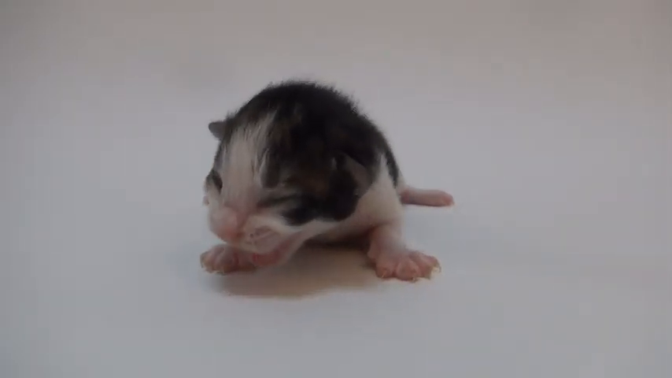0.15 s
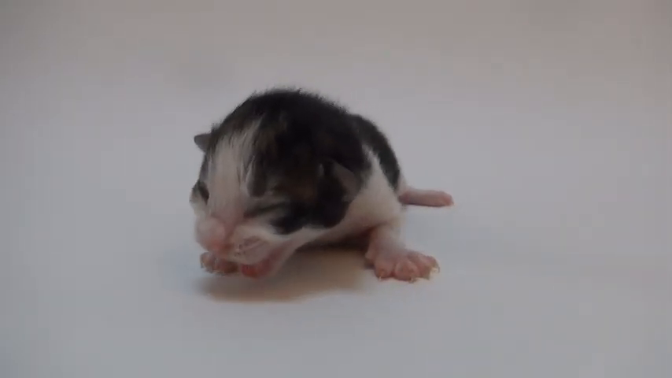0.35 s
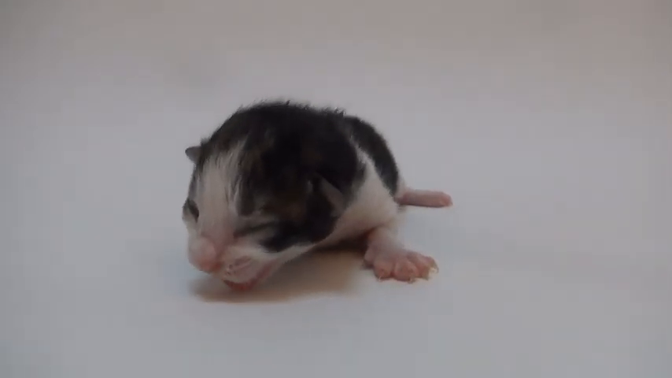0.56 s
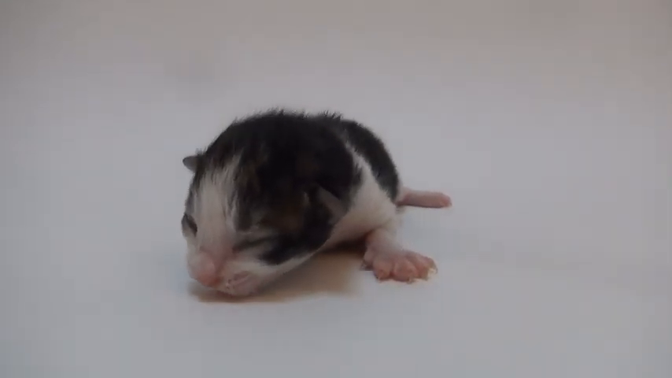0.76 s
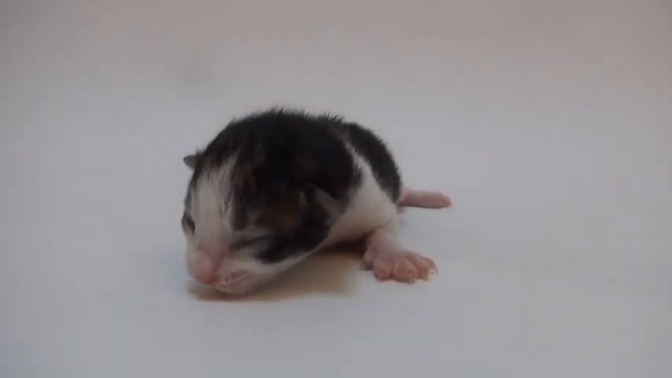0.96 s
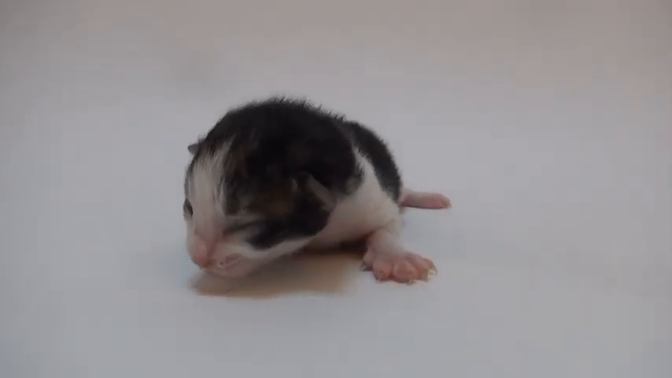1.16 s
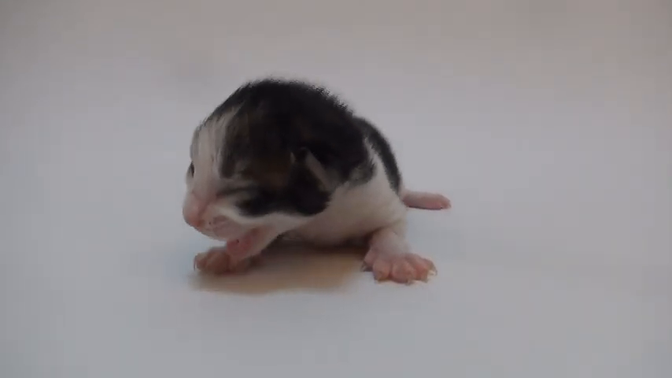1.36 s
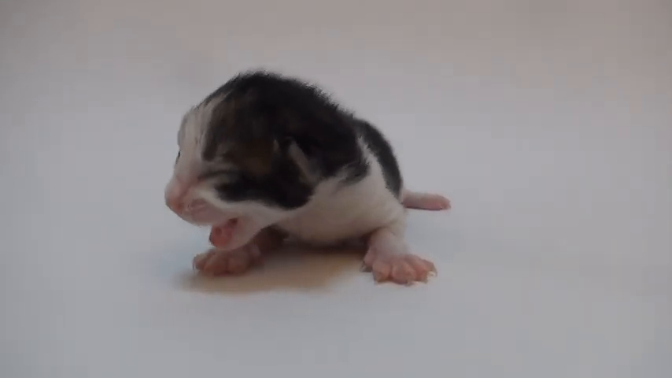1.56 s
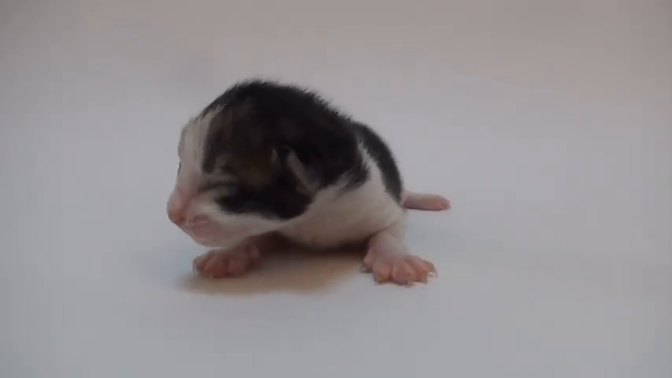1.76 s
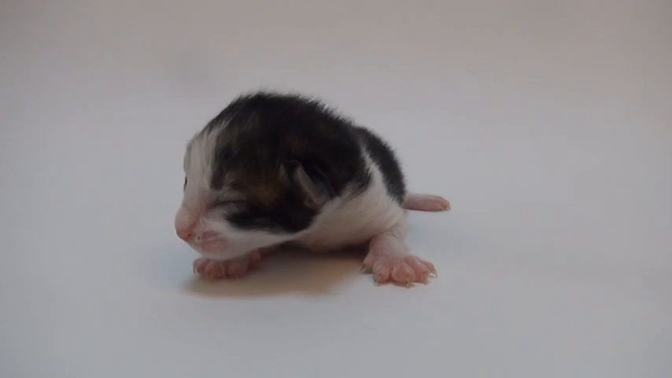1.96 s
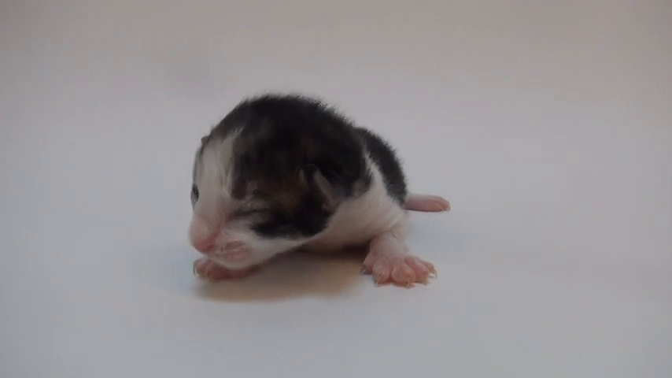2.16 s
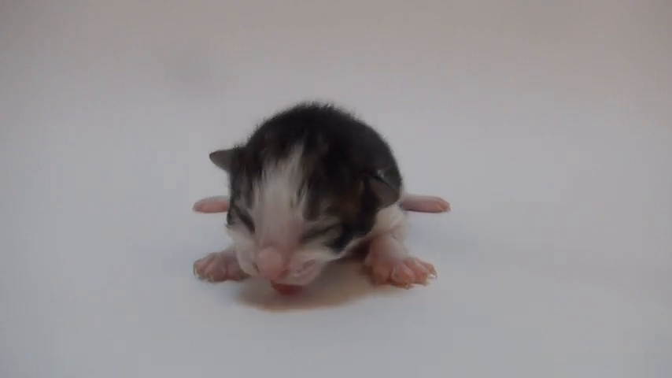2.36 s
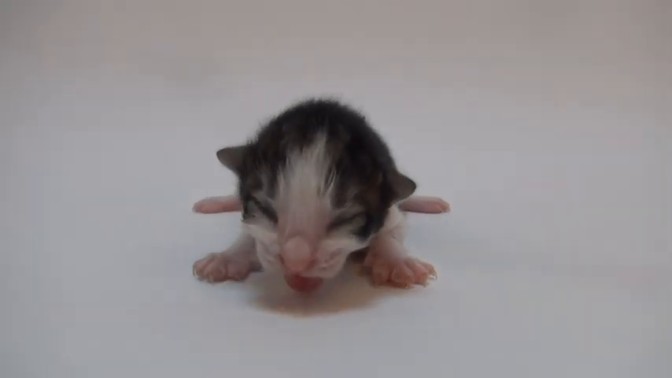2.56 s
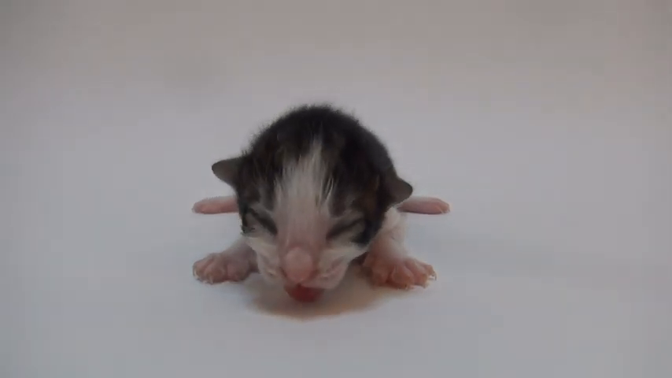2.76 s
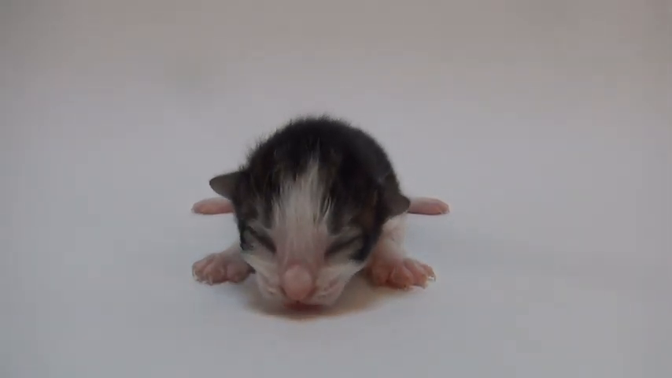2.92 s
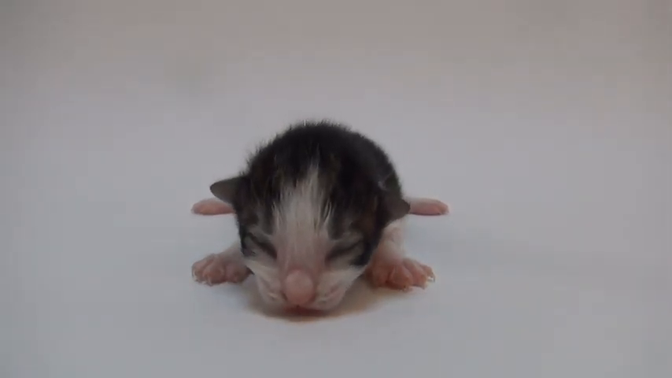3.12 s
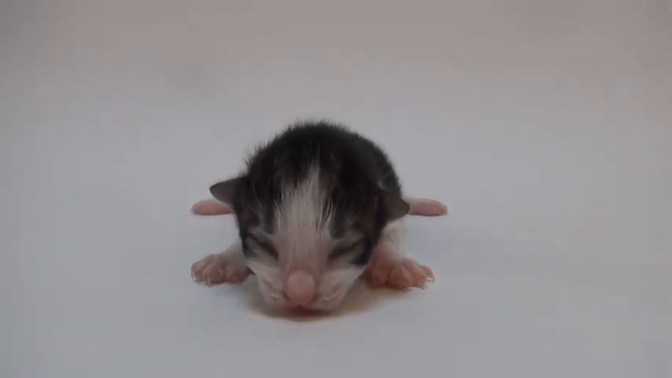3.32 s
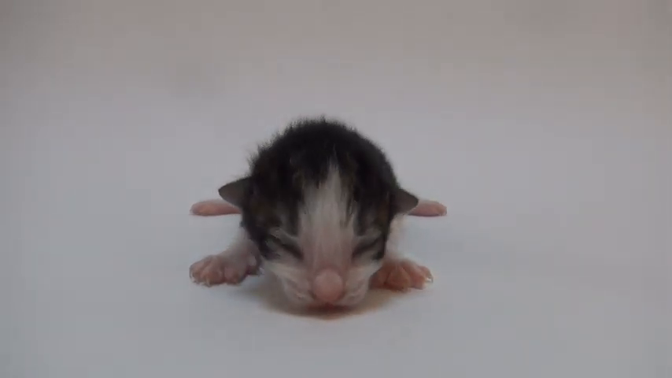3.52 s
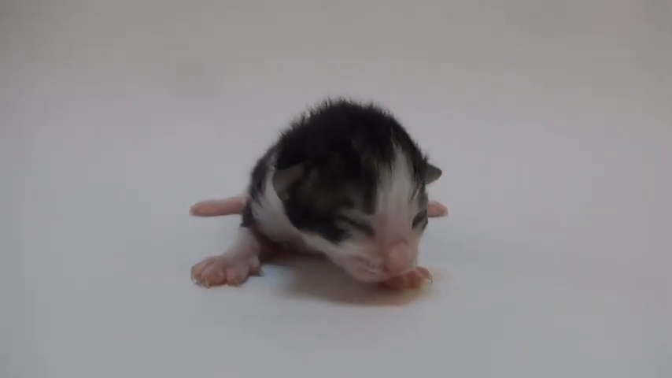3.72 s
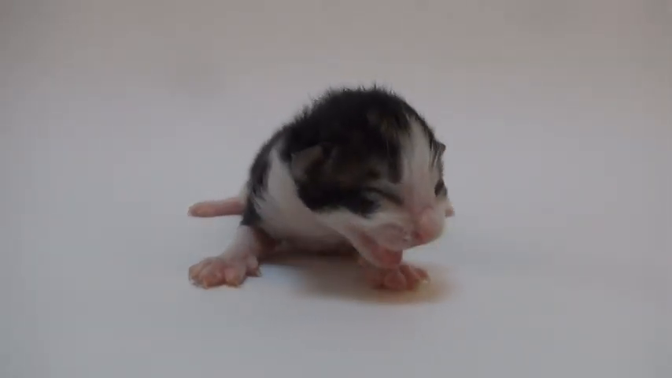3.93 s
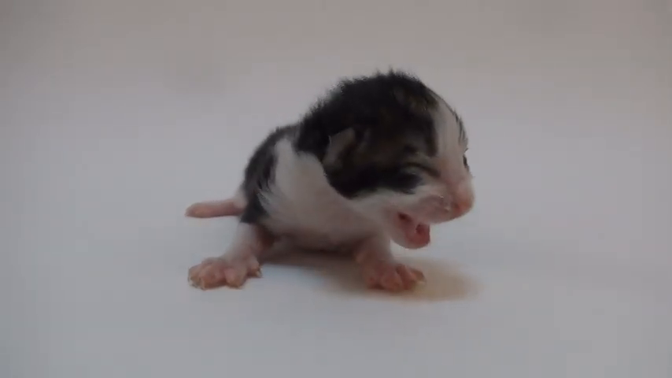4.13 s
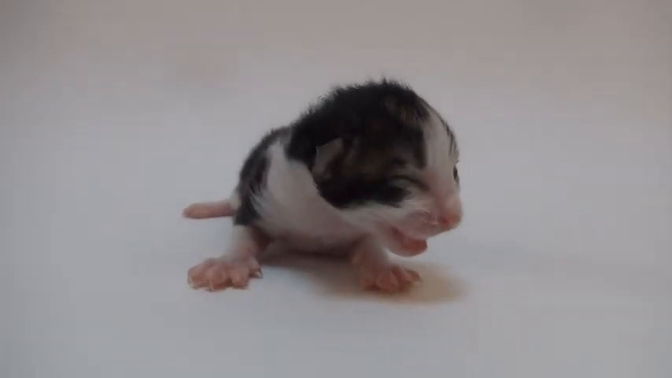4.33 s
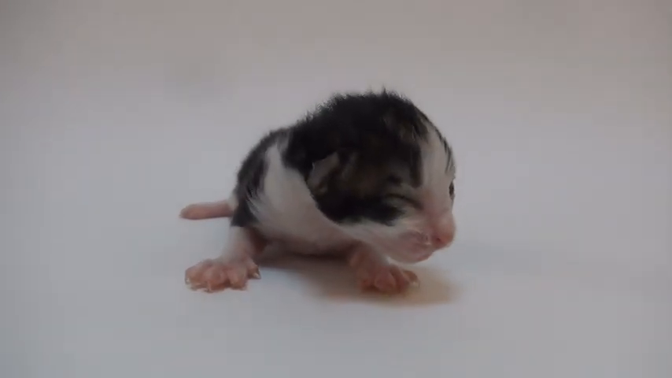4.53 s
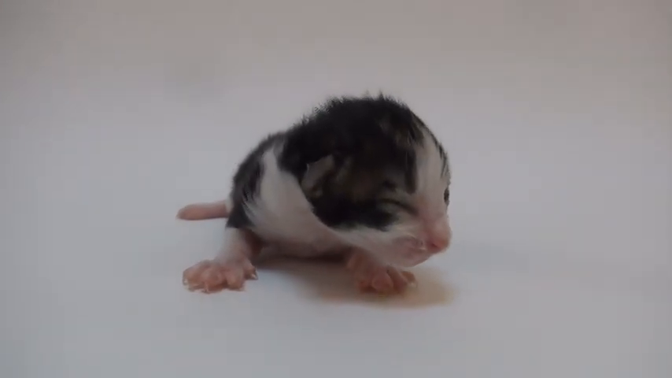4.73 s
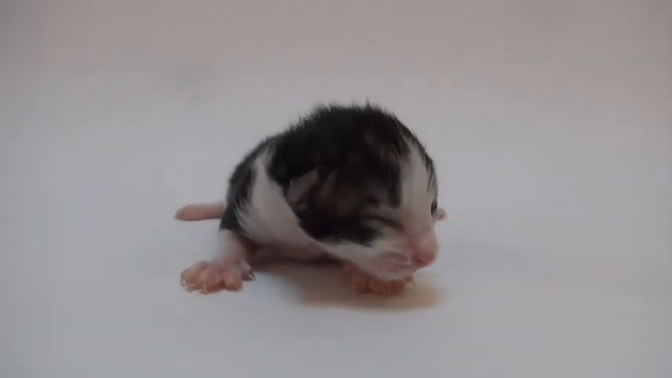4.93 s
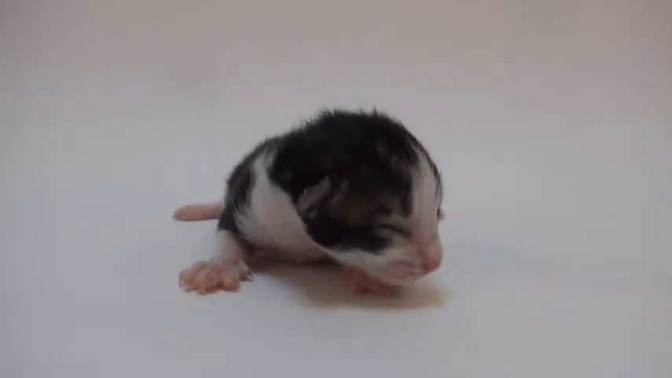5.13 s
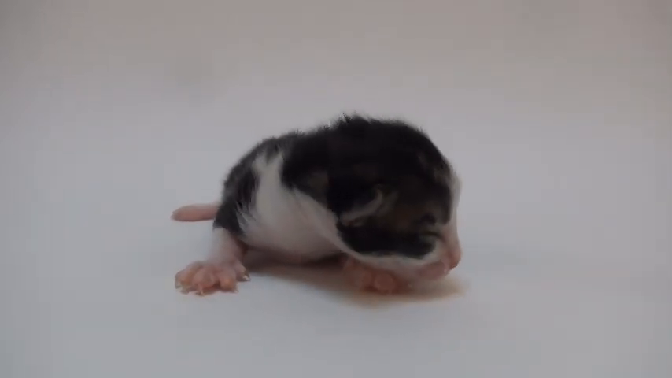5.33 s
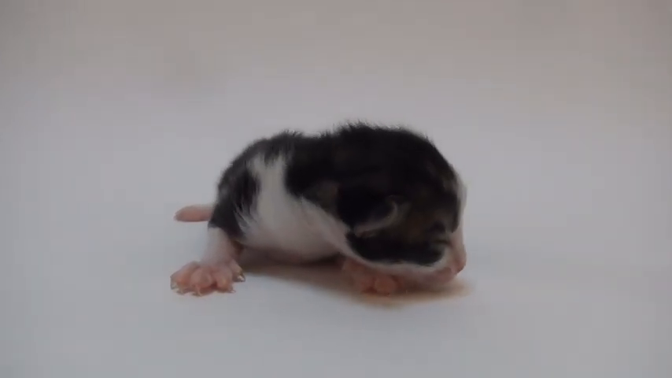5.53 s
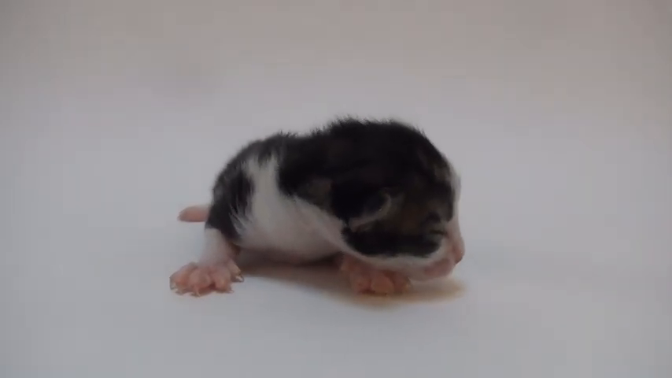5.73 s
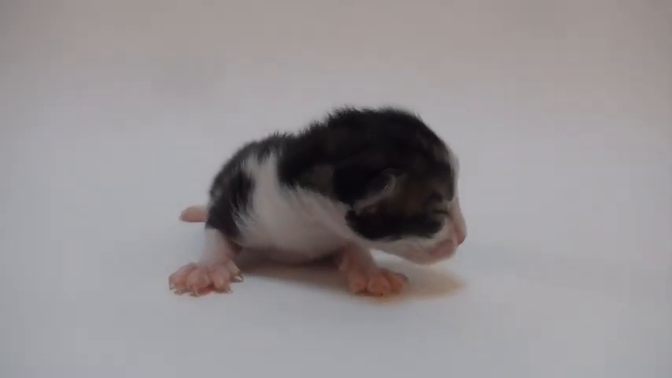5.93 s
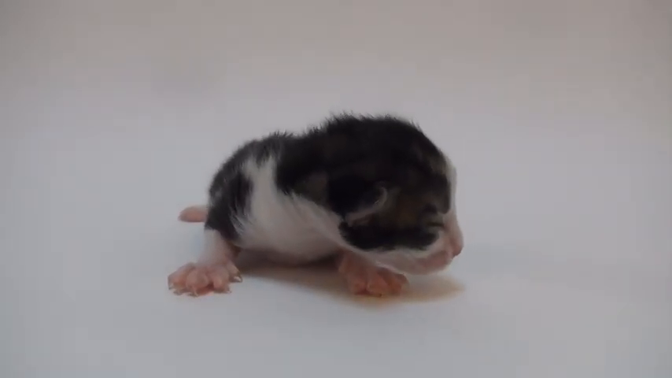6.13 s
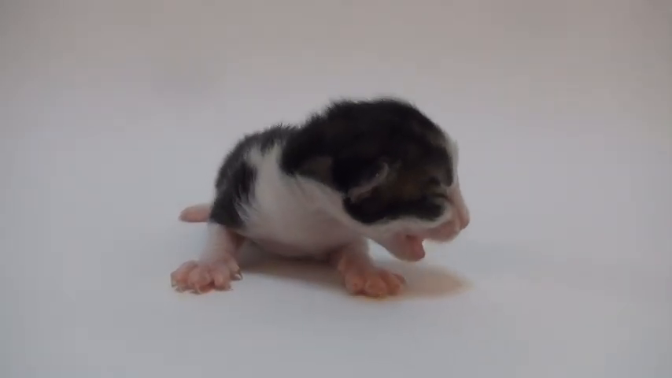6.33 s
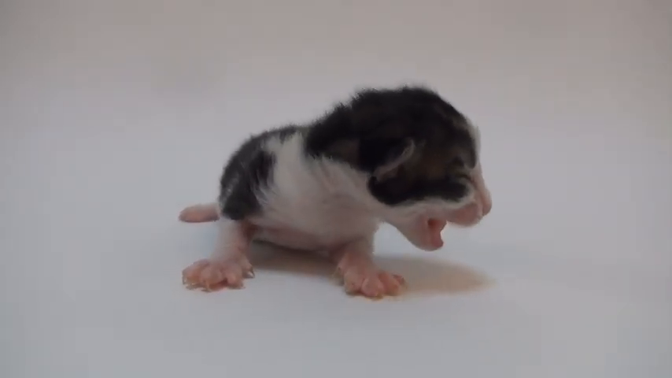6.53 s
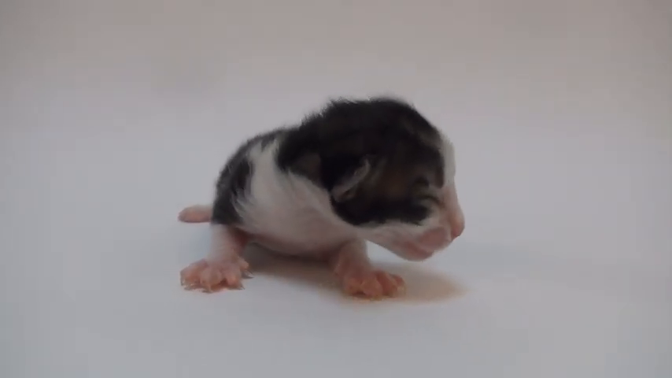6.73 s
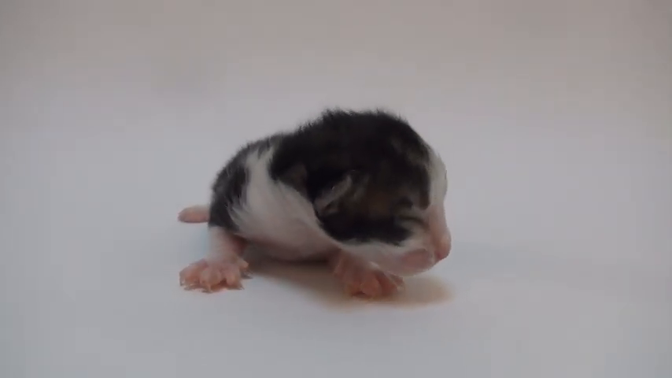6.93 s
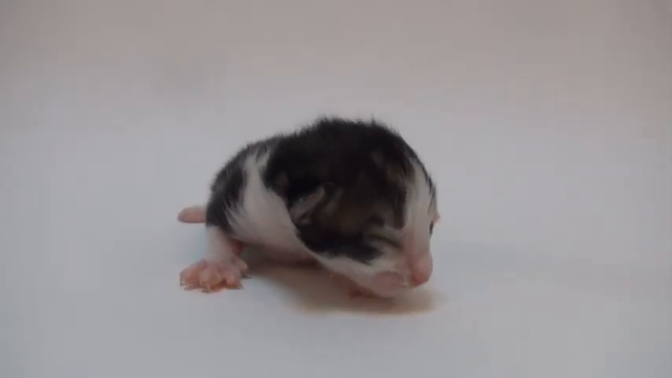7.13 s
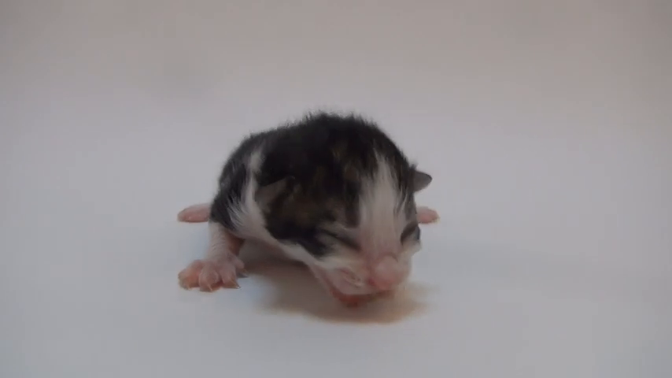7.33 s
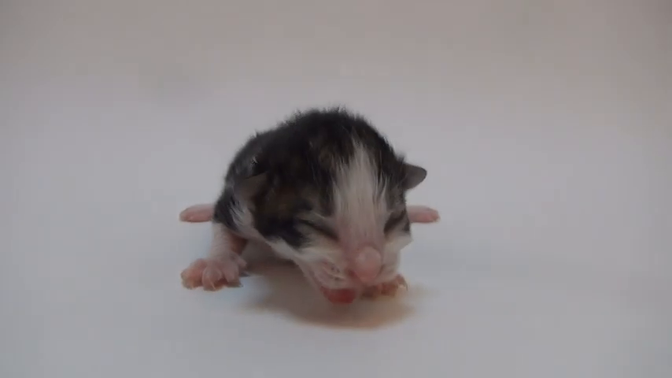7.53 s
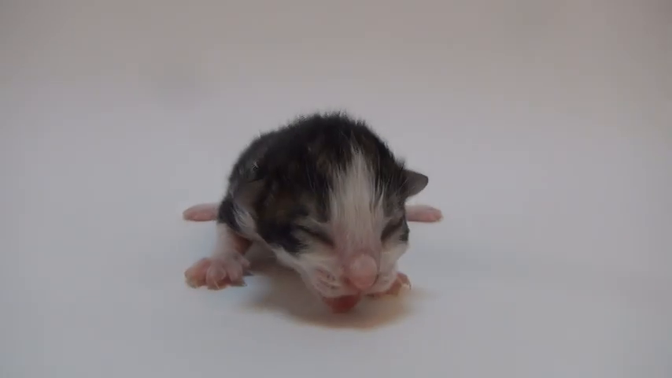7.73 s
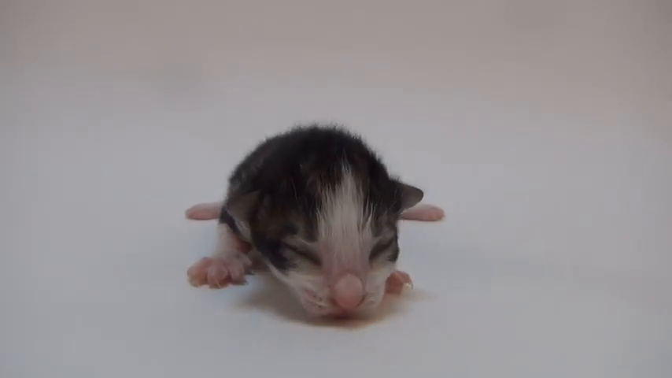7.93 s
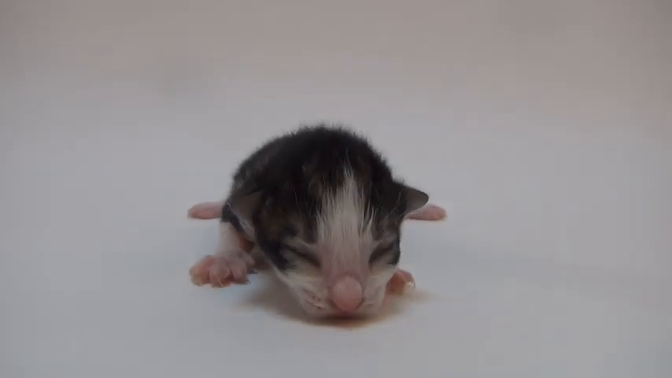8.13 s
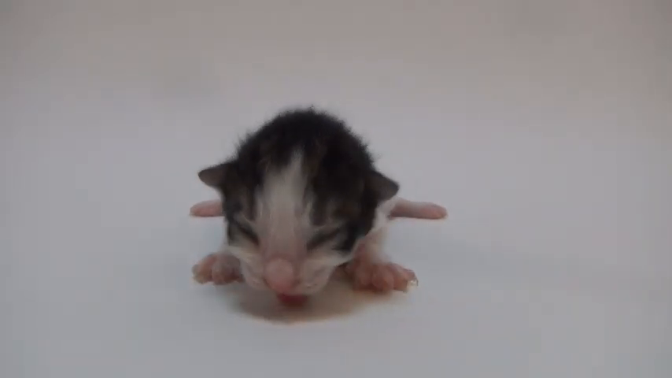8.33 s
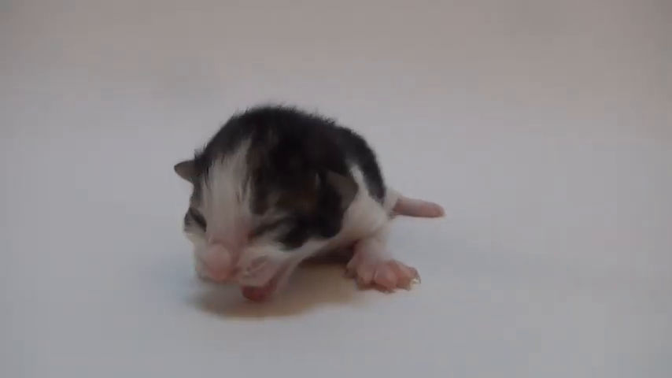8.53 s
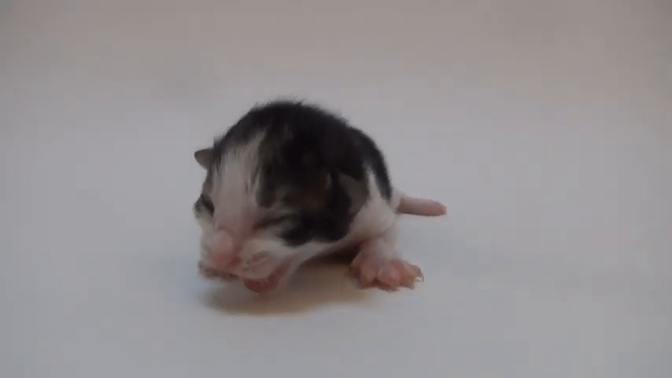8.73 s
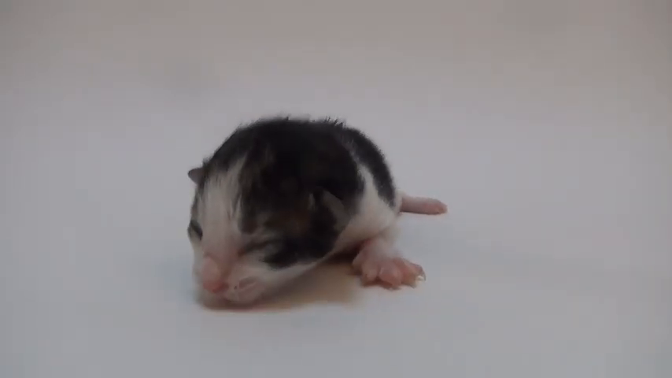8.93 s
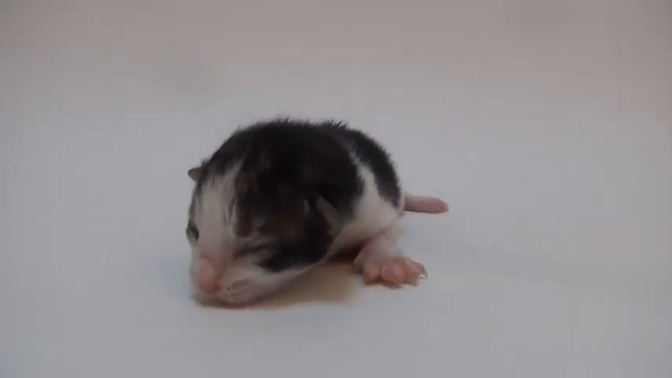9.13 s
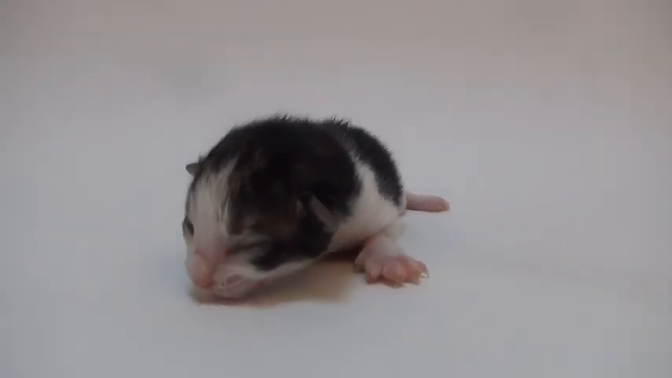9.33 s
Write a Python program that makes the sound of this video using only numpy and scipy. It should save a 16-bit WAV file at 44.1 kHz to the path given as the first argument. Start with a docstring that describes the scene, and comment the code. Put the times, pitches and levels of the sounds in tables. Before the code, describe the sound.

Close, squeaky cries of a tiny kitten repeat about once a second over a soft indoor appliance hum.

```python
"""A newborn kitten mews again and again, close by on a table in a small room.
Its vocal folds are a harmonic source, filtered by throat and mouth. Each mew rises in the chest
register, breaks upward into a thin high cry and drops back as the mouth shuts.
Lips tick and paws scrape in faint bursts of noise, and an appliance hums in the background."""
import sys
import numpy as np
from scipy import signal
from scipy.fft import rfft, irfft, next_fast_len
from scipy.io import wavfile
from scipy.ndimage import uniform_filter1d, minimum_filter1d

SR = 44100
rng = np.random.default_rng(int(sys.argv[2]) if len(sys.argv) > 2 else 0)


def pcm_store(signal):
    """Save signal as 16-bit PCM."""
    levels = np.round(np.clip(np.atleast_2d(signal), -1, 1) * 32767)
    wavfile.write(sys.argv[1], SR, levels.astype(np.int16).T)


N = 417627
TIME = np.arange(N) / SR


def amp(db):
    """Amplitude ratio of a level in decibels."""
    return 10 ** (np.asarray(db) / 20)


def unit_rms(x):
    """Normalisation to rms 1."""
    return x / np.sqrt(np.mean(x ** 2) + 1e-20)


def curve_at(points, hz):
    """Interpolation on a log-frequency axis."""
    f, value = np.transpose(points)
    return np.interp(np.log(hz + 1), np.log(f + 1), value)


def add(mix, start, sound):
    """Superposition of a sound from its start in seconds."""
    part = mix[max(round(start * SR), 0):][:len(sound)]
    part += sound[:len(part)]


def band(size, hz, width):
    """Band-pass noise of rms 1; centred on 0 Hz it is a random wobble."""
    n = next_fast_len(size + SR // 8)
    f = np.fft.rfftfreq(n, 1 / SR)
    spectrum = rfft(rng.standard_normal(n)) / (1 + (2 * (f - hz) / width) ** 4)
    return unit_rms(irfft(spectrum, n))[:size]


def during(t, start, end, edge=0.0079):
    """Trapezoidal gate: 1 between start and end, with short ramps."""
    return np.clip((t - start) / edge + .5, 0, 1) * np.clip((end - t) / edge + .5, 0, 1)


def crackle(size, per_s, decay_s):
    """Shot-noise envelope: random impulses, each decaying exponentially."""
    snaps = (rng.random(size) < per_s / SR) * rng.random(size)
    return signal.lfilter([1], [1, -np.exp(-1 / (decay_s * SR))], snaps)


# Spectrum of the room noise. Each row: frequency in Hz, relative density in dB.
AIR_SPECTRUM = [(25, -19), (48, -14), (85, -19), (200, -14), (400, -15), (600, -7), (860, -3.5),
                (1200, -13.5), (1700, -12.5), (3300, -27), (6500, -40), (16000, -48)]
def air_noise():
    """Spectral shaping turns white noise into a steady rush of air."""
    f = np.fft.rfftfreq(N, 1 / SR)
    return unit_rms(irfft(rfft(rng.standard_normal(N)) * amp(curve_at(AIR_SPECTRUM, f)), N))


# Appliance tones. Each row: frequency in Hz, bandwidth in Hz, level in dB.
HUM_TONES = [(132.7, 25, -65.5), (320.6, 21, -65.5), (888.8, 40, -49.5), (2190, 2, -63)]
def appliance_hum():
    """Narrow-band noise is heard as wavering tones."""
    return sum(amp(db) * band(N, hz, width) for hz, width, db in HUM_TONES)


# Slow swell of air and hum. Each row: time in seconds, gain in dB.
BACKGROUND_SWELL = [(0, -3.5), (1.2, -0.5), (1.6, -2.5), (2.2, -0.5), (2.7, -3.5), (3.7, 1), (4.2, -2),
                    (5, 2.5), (7, 3), (7.7, -1), (9.4, -0.5)]
# Soft low rumbles. Each row: start in seconds, end in seconds, level in dB.
RUMBLES = [(0.098, .27, -55), (2.15, 2.554, -62), (6.869, 7.295, -57.5), (9.12, 9.465, -65)]
def background(air_db=-46.5, bass_lean_db=-6, spread_db=-68.5):
    """Air, hum and rumble superpose; a level difference between channels puts the bass to the right."""
    swell = amp(np.interp(TIME, *np.transpose(BACKGROUND_SWELL)))
    hum = appliance_hum()
    rumble = band(N, 45, 35) * sum(amp(db) * during(TIME, a, b, edge=0.055) for a, b, db in RUMBLES)
    spectrum = rfft((amp(air_db) * air_noise() + hum) * swell + rumble)
    lean_db = curve_at([(90, bass_lean_db), (550, 0)], np.fft.rfftfreq(N, 1 / SR))
    spread = amp(spread_db) * swell * air_noise()
    return np.array([irfft(spectrum * amp(side * lean_db / 2), N) + side * spread for side in (1, -1)])


# Room decay. Each row: frequency in Hz, reverberation time in seconds, level in dB.
ROOM_DECAY = [(300, .45, -5), (940, 0.38, -7.5), (1600, 0.55, -12.5), (2760, 0.51, -10), (4500, 0.33, -18),
              (12000, 0.15, -9.5)]
def reverberation(x, first_echo_s=0.0045):
    """Convolution with sparse reflections; each band decays exponentially at its own rate."""
    t = np.arange(SR) / SR
    taps = rng.choice([-1., 1.], SR) * (rng.random(SR) < 3000 / SR) * (t > first_echo_s)
    hz, when, spectra = signal.stft(taps, SR, nperseg=256)
    f, t60, db = np.transpose(ROOM_DECAY)
    t60, db = curve_at(np.c_[f, t60], hz)[:, None], curve_at(np.c_[f, db], hz)[:, None]
    energy = np.sum(taps ** 2) * t60 / np.log(10 ** 6)
    decay = np.exp(-np.log(1000) * when / t60)
    tail = signal.istft(spectra * amp(db) * decay / np.sqrt(energy), SR, nperseg=256)[1]
    return signal.fftconvolve(x, tail)[:N]


def small_creak(start=3.425, end=3.482, hz=3000, width_hz=2200, level_db=-56, fizz_db=-13):
    """Pulse-modulated noise: one brief, creak-like grunt from the kitten."""
    noise = band(N, hz, width_hz) + amp(fizz_db) * band(N, 8200, 5000)
    return amp(level_db) * during(TIME, start, end) * unit_rms(noise * crackle(N, 260, 0.00085))


# Claws and fur on the table. Each row: start in seconds, end in seconds, level in dB.
CLAW_SCRAPES = [(3.544, 3.648, -65), (3.676, 3.706, -54), (5.333, 5.46, -65.5), (5.598, 5.624, -54.5),
                (5.875, 5.891, -48)]
def claw_scrapes(catches_per_s=300, catch_depth=7):
    """Sliding friction makes a soft hiss, modulated by tiny catches of the claws."""
    strength = 1 + catch_depth * crackle(N, catches_per_s, decay_s=0.00059)
    level = sum(amp(db) * during(TIME, a, b) for a, b, db in CLAW_SCRAPES)
    return level * unit_rms(strength * band(N, 10300, 11600))


# Wet ticks of lips and tongue. Each row: time in seconds, relative peak in dB, centre in Hz.
LIP_TICKS = [(1.2874, -26.5, 9300), (1.867, -42, 8500), (2.3176, -23, 7950), (3.8196, -27.5, 11100),
             (4.989, -37, 9000), (5.1993, -33.5, 10200), (6.255, -23, 8460), (7.264, -23.5, 11800),
             (7.2717, -22, 8120), (7.2866, -20, 8280), (8.361, -22, 8380), (9.4396, -23, 7420)]
def lip_ticks(width_hz=6000, decay_s=0.00048, ring_db=-16, gain_db=-2):
    """A brief transient is broadband: each tick is bright noise over a faint mouth resonance."""
    out, t = np.zeros(N), np.arange(SR // 40) / SR
    for start, db, hz in LIP_TICKS:
        noise = band(len(t), hz, width_hz) + amp(ring_db) * band(len(t), 3500, 3000)
        burst = noise * t * np.exp(-2 * t / decay_s)
        add(out, start, amp(db + gain_db) * burst / abs(burst).max())
    return out


def breath_puffs(starts, lead_s=0.039, length_s=0.25, hz=2300, width_hz=2600, level_db=-54):
    """Turbulent airflow gives a soft rush at the start of each mew."""
    gate = sum(during(TIME, s - lead_s, s - lead_s + length_s, edge=0.039) for s in starts)
    return amp(level_db) * gate * band(N, hz, width_hz)


def mouth_hiss(phase, closing, rasp, hiss_db=-49, closing_db=-5, rasp_share=0.28, saliva_db=-28.5):
    """Turbulence and saliva pops in the mouth, amplitude-modulated by the folds."""
    level = amp(hiss_db + closing * closing_db) + rasp_share * rasp
    level += amp(saliva_db) * crackle(len(phase), per_s=17, decay_s=0.0031)
    return level * (1 + np.cos(phase)) * band(len(phase), 10200, 8800)


def lip_gap(t, f, start=6.255, end=6.315, hz=8000, width_hz=1000, peak_db=19):
    """Resonance of the narrow gap as the lips once part slowly, as a boost in dB."""
    return peak_db * during(t, start, end, edge=0.017) / (1 + ((f - hz) / width_hz) ** 2)


# Throat and mouth while opening, crying and closing. Each row: frequency in Hz, gain in dB.
TRACT_OPENING = [(600, -4), (1400, -2.5), (2200, -1), (2900, -4), (3400, -6.5), (3950, -1.5), (4600, -11),
                 (5600, -19.5), (7500, -22), (11300, -27.5), (16300, -37)]
TRACT_CRYING = [(1400, 1.5), (3000, -6), (4200, -14), (5500, -28.5), (6500, -26.5), (9000, -34),
                (11200, -29.5), (14000, -30), (16300, -40)]
TRACT_CLOSING = [(600, -1), (1200, -8.5), (1800, 3), (2500, -6), (3200, -14), (4300, -27.5), (5500, -39),
                 (7800, -28), (9700, -39.5), (12000, -28), (14500, -49)]
def vocal_tract(t, f, stages, start, effort_db, sheen_db, parting_s=0.01, shut_db=-17):
    """Formant filtering: the gain in dB of a tract that changes shape at each register break."""
    shapes = TRACT_OPENING, TRACT_CRYING, TRACT_CLOSING
    db = sum(stage * curve_at(shape, f) for stage, shape in zip(stages, shapes))
    gape = np.clip((effort_db + 37) / 14, 0, 1)  # only a wide-open mouth beams the top treble
    db += gape * curve_at([(6000, 0.027), (12000, sheen_db)], f)
    muffled = np.clip(1 - (t - start) / parting_s, 0, 1)  # the voice starts behind closed lips
    return db + muffled * curve_at([(3000, 0.014), (7000, shut_db)], f) + lip_gap(t, f)


def gesture(table, t, marks, bend=1):
    """Time warping: a table's progress 0, 1, .. is stretched over the time marks."""
    progress, *columns = np.transpose(table)
    now = np.interp(t, marks, np.arange(len(marks)))
    now = np.where(now < 1, now ** bend, now)
    return np.array([np.interp(now, progress, column) for column in columns])


# Vocal effort. Each row: progress, effort in dB, boosts in dB of harmonic 2 and of all higher ones.
RISE_GESTURE = [(0.0, -42, -12.0, -14), (0.2, -47, 4, -7.0), (0.4, -36, -7, -2.0), (0.6, -33.5, 8, 8.0),
                (0.8, -31, 9.5, 8), (1.0, -24, 10, 3), (1.4, -22, 12, 2.5), (2.0, -20, 6.5, -3)]  # 0-1 the rise, 1-2 the held chest note
CRY_GESTURE = [(0.0, -16, 1.06, 1.5), (0.35, -17.5, 0.66, 0.5), (0.75, -20.5, 2.8, -2),
               (1.0, -25.0, 2.1, -5)]  # 0-1 from the flip to the drop
FALL_GESTURE = [(0, -20, 2.5, -1), (.3, -28, 1.6, 1), (.65, -35, 3.4, 2.5), (1, -40.5, 4, -7.5),
                (2, -59.5, 1, 9)]  # 0-1 the fall, 1-2 the murmur
MURMUR_S = 0.033  # the voice lingers behind the lips
def vocal_effort(t, times, stages, bend):
    """Level and spectral balance vary together, along a gesture shared by all mews."""
    start, top, flip, drop, shut = times
    opening, crying, closing = stages
    return (opening * gesture(RISE_GESTURE, t, [start, top, flip])
            + crying * gesture(CRY_GESTURE, t, [flip, drop])
            + closing * gesture(FALL_GESTURE, t, [drop, shut, shut + MURMUR_S], bend))


# Brief catches of the voice. Each row: start in seconds, end in seconds, pitch shift in Hz.
PITCH_CATCHES = [(2.311, 2.335, 59.5), (2.521, 2.535, 71), (2.823, 2.876, 45.5), (3.955, 4.003, 45),
                 (4.417, 4.487, 57.5), (4.435, 4.45, 131), (6.281, 6.308, -65), (6.458, 6.49, -29),
                 (7.517, 7.58, -39), (8.505, 8.541, -30)]
def pitch_contour(t, times, stages, pitches, onset_hz=516.5, settle_s=0.03, overshoot_s=0.0245,
                  droop_hz=35.4, droop_s=0.0148):
    """The fundamental glides within a register and jumps between them: rise, sagging cry, fall."""
    start, top, flip, drop, shut = times
    opening, crying, closing = stages
    top_hz, held_hz, ease, cry_hz, sagged_hz, overshoot_hz, bow_hz, fall_hz, last_hz, bend = pitches
    rise = top_hz - (top_hz - onset_hz) * np.interp(t, [start, top], [1, 0]) ** ease
    rise += (held_hz - top_hz) * (1 - np.exp(-np.maximum(t - top, 0) / settle_s))
    along = np.interp(t, [flip, drop], [0, 1])
    cry = cry_hz + (sagged_hz - cry_hz) * along + bow_hz * (1 - (2 * along - 1) ** 2)
    cry += overshoot_hz * np.exp(-abs(t - flip) / overshoot_s)
    cry -= droop_hz * np.exp(-abs(t - drop) / droop_s)  # the cry gives way just before it drops
    fall = fall_hz + (last_hz - fall_hz) * np.interp(t, [drop, shut], [0, 1]) ** bend
    catches = sum(hz * during(t, a, b) for a, b, hz in PITCH_CATCHES)
    return opening * rise + crying * cry + closing * fall + catches


# Hoarse spells. Each row: start in seconds, end in seconds, depth of pulse alternation, rasp in dB.
HOARSE_SPELLS = [(2.517, 2.536, 0.14, -30), (4.067, 4.173, 0.02, -43), (4.419, 4.513, 0.23, -33),
                 (6.35, 6.407, .02, -40), (7.505, 7.564, 0.048, -33.5), (8.607, 8.612, 0.047, -41)]
def vocal_folds(t, hz, opening, waver=0.0021, jitter=0.002525, slack_jitter=0.032, slack_hz=880):
    """Slack or strained folds jitter; period doubling adds lines between the harmonics."""
    alternation = sum(depth * during(t, a, b) for a, b, depth, _ in HOARSE_SPELLS)
    rasp = sum(amp(db) * during(t, a, b) for a, b, _, db in HOARSE_SPELLS)
    unsteady = jitter + slack_jitter * np.clip(4 * (1 - hz / slack_hz), 0, 1) + 0.2 * rasp
    pitch = hz * (1 + waver * (1 + opening) * band(len(t), 0, 79) + unsteady * band(len(t), 0, 900))
    phase = 2 * np.pi * np.cumsum(pitch) / SR
    doubling = 1 + alternation * np.cos(phase / 2)
    return phase, doubling, rasp


# The mews. Each row: start, top of the rise and mouth shut in seconds;
# the rise's top and held pitch in Hz, and its easing exponent;
# the cry's first pitch, last pitch, overshoot and mid-way bow in Hz;
# the fall's first and last pitch in Hz, and its bend exponent (above 1 it lingers, then plunges);
# gains in dB of rise, cry, swell over the cry, fall, murmur, rise overtones, fall overtones,
# the cry's second harmonic, its overtones and the top treble.
MEWS = [(-0.058, 0.092, 0.765, 1531, 1479, 1.6, 1615, 1341.0, -26.0, 5.5, 1160.0, 645, 0.95, 0.13, -0.47, -1, -0.5, -7.5, 0.5, 2.5, 1, 2, -10),
        (1.236, 1.402, 1.825, 1530, 1436, 1.86, 1668, 1436.0, -100.0, -69, 1212.0, 606.5, 1.17, 0.4, -1.7, -2, 0, 13, -1, 5, 0.5, 1.5, -8),
        (2.259, 2.44, 3.025, 1443, 1405, 1.57, 1649, 1334, -21.5, -19.5, 1155.0, 649, 0.89, 1.7, -0.72, 0.5, -1.5, -2.0, 0.5, 3.5, 5, 5, -7),
        (3.787, 3.936, 4.755, 1294, 1378, 1.5, 1621, 1428, -1.5, 11.5, 1152.0, 611, 2, -2.4, -0.27, 5, 1, -2.0, -3.5, -6, -3.5, -6.0, 5),
        (6.23, 6.428, 6.835, 1518, 1644, 1.53, 1693, 1540, 34.5, -9.5, 1308.0, 690.0, 1.66, 4.4, -0.24, 3, 0.5, 19.5, 1.5, 4.5, -4, 0, -4.5),
        (7.237, 7.402, 7.915, 1437, 1578, 1.67, 1697, 1482, 118, 27.0, 1275.0, 729, 0.91, 0.17, 1.0, 1.5, 1, 7, 5.5, 7, 4.5, 5.5, -5),
        (8.309, 8.467, 8.975, 1398, 1489, 1.74, 1718, 1465.0, -2, 9.0, 1251.0, 644, 1.27, -0.26, 1.0, 0.0, -0.5, 3, 6, 6.5, 2.5, 3, -9.5),
        (9.38, 9.54, 10.05, 1440, 1450.0, 1.58, 1700.0, 1450.0, 0.0, 0.0, 1250.0, 650.0, 1.0, -1.3, 0.0, 0.0, 0.0, 0.0, -1.5, 0.0, 0.0, 0.0, 12)]
# Register breaks, mew by mew. Each row: upward flip in seconds, drop back in seconds.
REGISTER_BREAKS = [(.32, .619), (1.552, 1.726), (2.534, 2.887), (4.066, 4.415), (6.444, 6.715),
                   (7.436, 7.809), (8.555, 8.853), (9.6, 9.9)]
def mew(row, breaks, break_s=0.0056, lips_close_s=0.06, tremble_db=1.12, drift_db=3.0, flutter_db=-45):
    """Source-filter principle: throat and mouth weight each harmonic of the vocal folds."""
    (start, top, shut), pitches = row[:3], row[3:13]
    rise_db, cry_db, swell_db, fall_db, murmur_db = row[13:18]
    rise_upper_db, fall_upper_db, cry_second_db, cry_upper_db, sheen_db = row[18:]
    flip, drop = breaks
    t = np.arange(max(start, 0), shut + MURMUR_S, 1 / SR)
    size = len(t)
    crying, closing = during(t, flip, drop, break_s), during(t, drop, np.inf, break_s)
    opening = 1 - crying - closing
    times, stages = (start, top, flip, drop, shut), (opening, crying, closing)
    hz = pitch_contour(t, times, stages, pitches)
    effort_db, second_db, upper_db = vocal_effort(t, times, stages, bend=pitches[-1])
    effort_db += opening * rise_db + crying * cry_db + closing * fall_db
    effort_db += tremble_db * band(size, 0, 30)
    effort_db += crying * swell_db * np.interp(t, [flip, drop], [-.5, .5])
    second_db += crying * cry_second_db + closing * 0.42 * fall_upper_db
    upper_db += opening * rise_upper_db + crying * cry_upper_db + closing * fall_upper_db
    phase, doubling, rasp = vocal_folds(t, hz, opening)
    voice = np.zeros(size)
    for k in range(1, 23):
        f = k * hz
        db = vocal_tract(t, f, stages, start, effort_db, sheen_db)
        if k == 1:  # with the mouth shut, the fundamental hums through the nose
            db += murmur_db * during(t, shut, np.inf, lips_close_s)
        elif k == 2:
            db += second_db
        else:  # the upper harmonics waver slowly and randomly in level
            db += upper_db + drift_db * min(k / 6, 1) * band(size, 0, 33)
        flutter = 1 + (amp(flutter_db) + rasp) * band(size, 0, 1900)
        voice += amp(db) * (f < SR / 2.4) * flutter * np.cos(k * phase)
    voice = voice * doubling + mouth_hiss(phase, closing, rasp)
    return t[0], amp(effort_db) * voice * signal.windows.tukey(size, .04)


# The kitten's head turns. Each row: time in seconds, left minus right level in dB.
HEAD_TURNS = [(1.7, 1.3), (3, 0.5), (4.2, -1), (6.6, -1.7), (7.7, 0.7), (8.7, 1)]
def scene(voice_db=3.5, room_spread_db=-20):
    """Direct sound, reverberation and background superpose in stereo."""
    voice = np.zeros(N)
    for row, breaks in zip(MEWS, REGISTER_BREAKS):
        add(voice, *mew(row, breaks))
    breath = breath_puffs([row[0] for row in MEWS])
    kitten = amp(voice_db) * voice + breath + lip_ticks() + claw_scrapes() + small_creak()
    pan_db = np.interp(TIME, *np.transpose(HEAD_TURNS))
    spread = amp(room_spread_db) * reverberation(kitten)
    panned = (kitten + reverberation(kitten)) * amp([pan_db / 2, -pan_db / 2])
    return panned + np.array([spread, -spread]) + background()


def record(dry, ceiling=0.45, cutoff_hz=16550):
    """Fast peak limiting flattens the loudest parts of the mews; a low-pass limits the bandwidth."""
    allowed_gain = np.minimum(1, ceiling / (abs(dry).max(axis=0) + 1e-9))
    gain = uniform_filter1d(minimum_filter1d(allowed_gain, size=400), size=300)
    low_pass = signal.firwin(511, cutoff_hz, window=("kaiser", 9), fs=SR)
    return signal.oaconvolve(dry * gain, low_pass[None], "same")


dry = scene()
out = record(dry)
pcm_store(out)
```